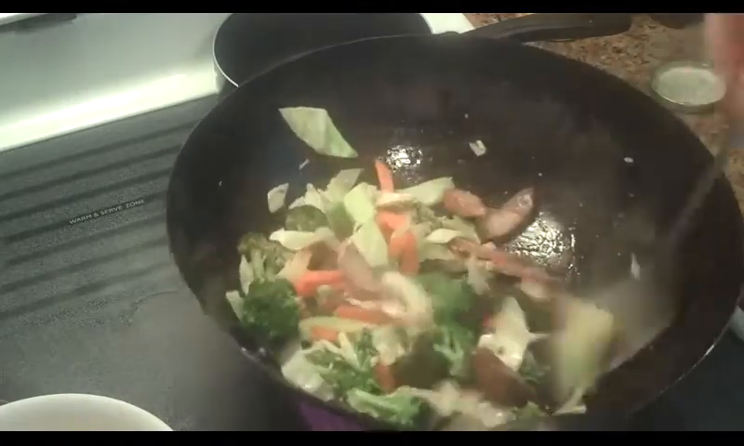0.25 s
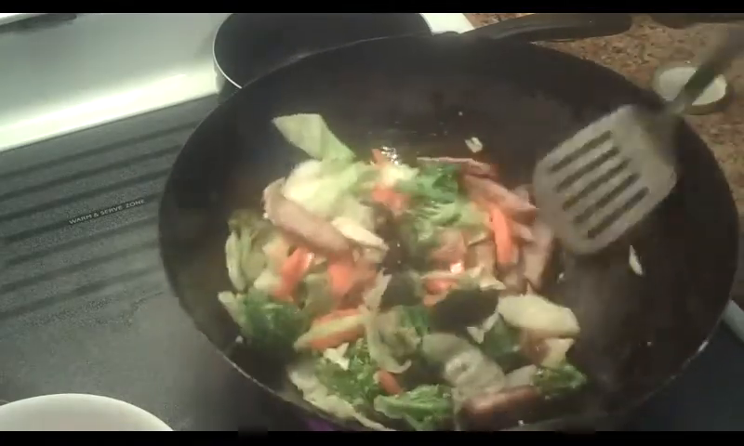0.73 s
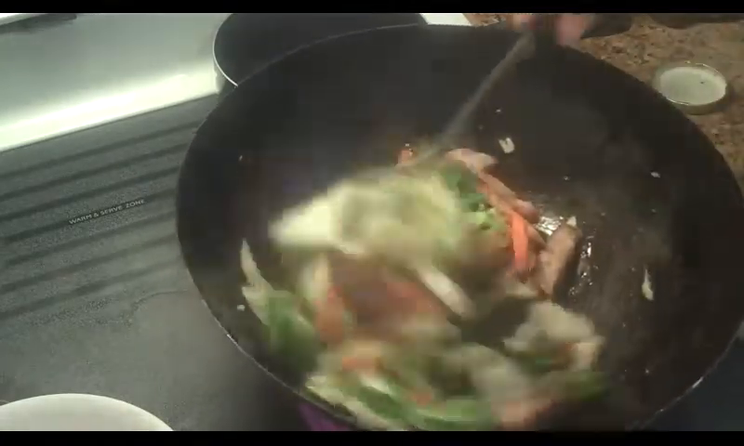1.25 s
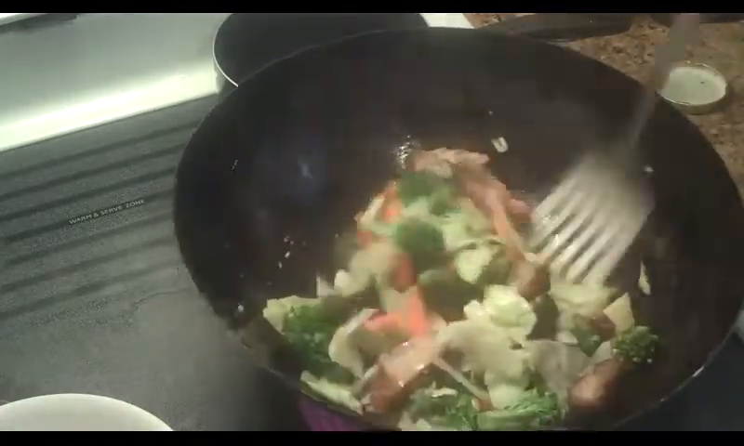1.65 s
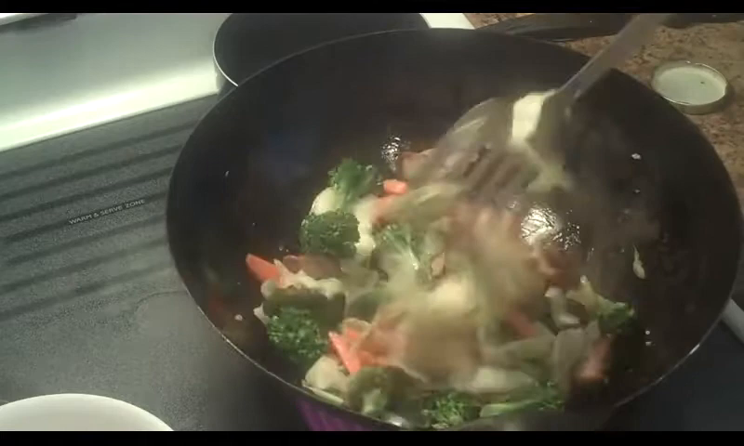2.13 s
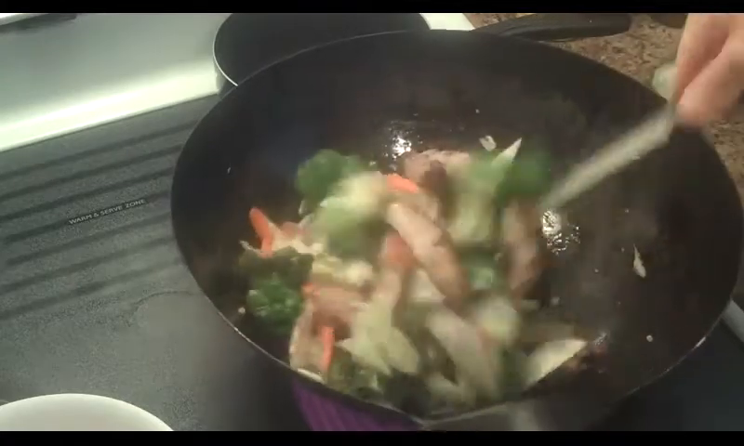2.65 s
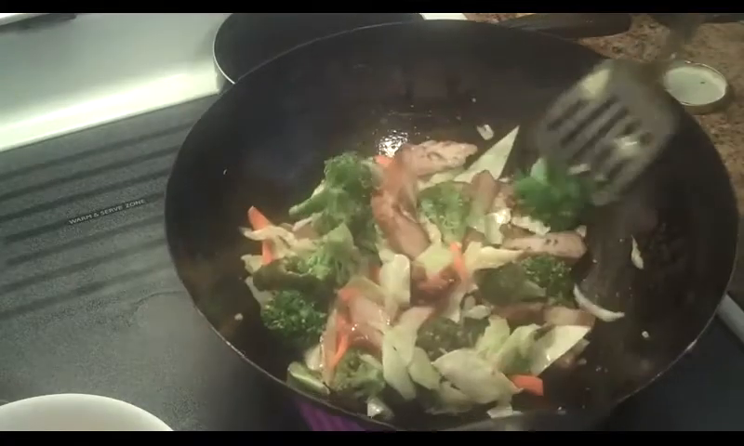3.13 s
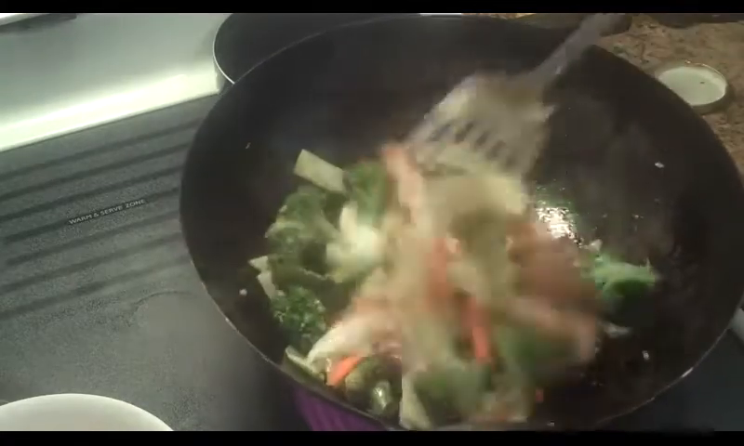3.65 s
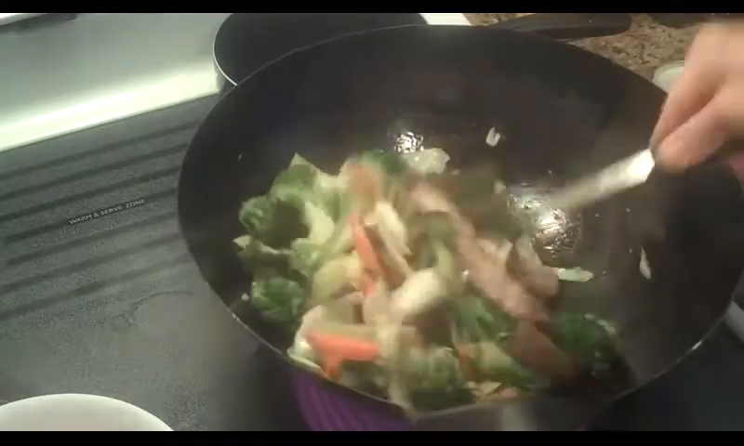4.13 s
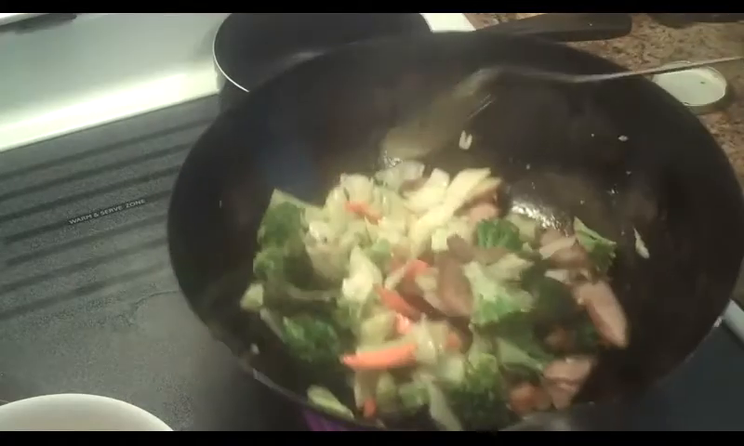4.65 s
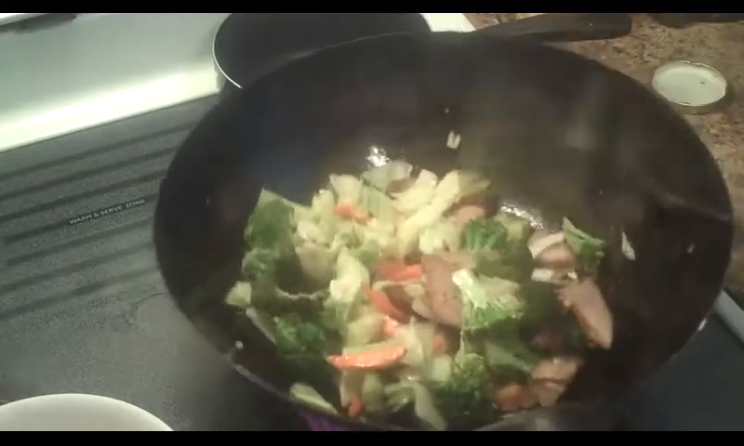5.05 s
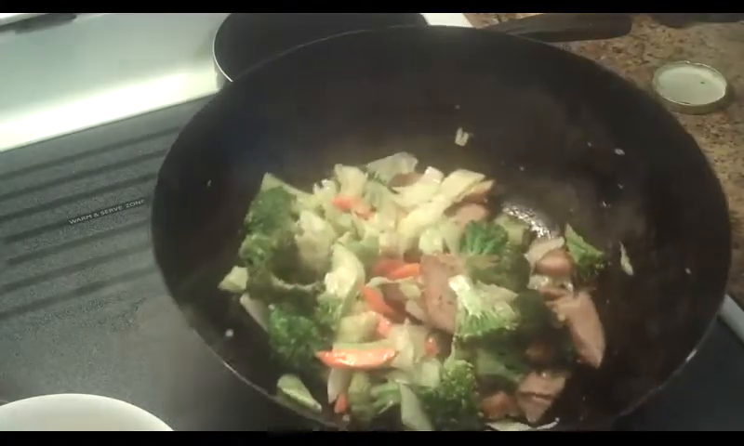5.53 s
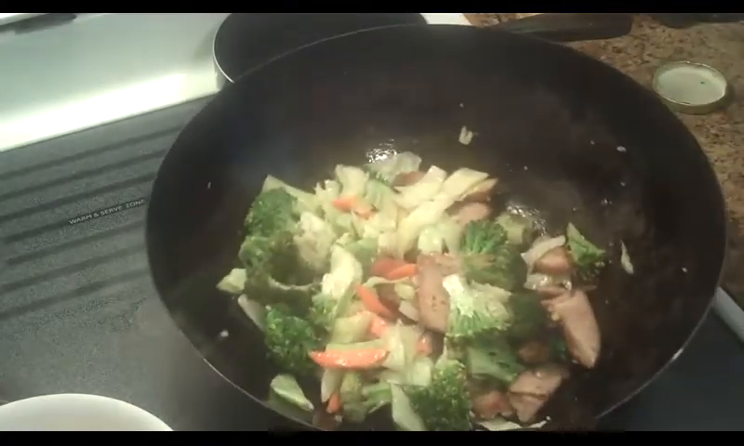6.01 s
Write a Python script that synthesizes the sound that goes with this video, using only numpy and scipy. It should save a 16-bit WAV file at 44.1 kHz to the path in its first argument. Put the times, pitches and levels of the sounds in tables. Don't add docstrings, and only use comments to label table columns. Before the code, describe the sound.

Close to a home stove, oil sizzles and crackles over a low hood hum. A steel spatula hits a food-filled wok five times, with bright damped clanks and raspy scrapes between them. Near the end, two quick louder taps on the rim ring out; the sizzle thins, then the spatula skids jerkily over a glazed dish. One close camera microphone, identical in both channels, slightly dull at the very top.

```python
import sys
import numpy as np
from scipy import signal
from scipy.fft import rfft, irfft
from scipy.io import wavfile
from scipy.ndimage import uniform_filter1d

SR = 44100
rng = np.random.default_rng(int(sys.argv[2]) if len(sys.argv) > 2 else 0)


def generate_wav(sig):
    pcm = np.round(np.clip(np.atleast_2d(sig).T, -1, 1) * 32767).astype(np.int16)
    wavfile.write(sys.argv[1], SR, pcm)


def nominal_scale(level):
    x = np.asarray(level, float) / 20
    return 10 ** x


N = 276948


def unit(x):
    return x / np.sqrt(np.mean(x ** 2) + 1e-30)


def peak_one(x):
    return x / np.abs(x).max()


def band(x, lo_hz, hi_hz):
    return signal.sosfilt(signal.butter(5, [lo_hz, hi_hz], "band", fs=SR, output="sos"), x)


def colour(x, points):
    hz, db = np.transpose(points)
    f = np.maximum(np.fft.rfftfreq(len(x), 1 / SR), 1)
    gain_db = np.interp(np.log(f), np.log(hz), db, left=-60, right=-60)
    return irfft(rfft(x) * nominal_scale(gain_db), len(x))


def ring(force, modes):
    out = 0
    for hz, gain, t60 in modes:
        pole = np.exp(2j * np.pi * hz / SR - np.log(1000) / (t60 * SR))
        out = out + gain * signal.lfilter([1], [1, -pole], force).imag
    return out


def resonances(peaks, narrow):
    modes = []
    for hz, width, db in peaks:
        width = width * narrow
        modes.append((hz, nominal_scale(db) * width, np.log(1000) / (np.pi * width)))
    return modes


def walk(rate):
    k = int(SR / rate)
    return 1.25 * uniform_filter1d(np.repeat(rng.standard_normal(N // k + 1), k), k)[:N]


def grit(rate, spread_db):
    clicks = (rng.random(N) < rate / SR) * rng.choice([-1, 1], N)
    return clicks * nominal_scale(spread_db * np.minimum(rng.exponential(size=N), 4.5))


def patches(x, centres, db_curves):
    f, spec = np.log(np.fft.rfftfreq(len(x), 1 / SR) + 1), rfft(x)
    out = 0
    for row, db in zip(np.eye(len(centres)), db_curves):
        out = out + nominal_scale(db) * irfft(spec * np.interp(f, np.log(centres), row), len(x))
    return out


def course(times, values, off_db=-120):
    return np.interp(np.arange(N) / SR, times, values, left=off_db, right=off_db)


def blow(row, high, low, spot_db, crack_t60, longest_t60):
    # frequency in Hz, level in dB.
    chief_pair = [(3975, 0), (4005, -12)]
    s, high_db, low_db, thump_db, chief_db = row
    t = np.arange(int(.7 * SR)) / SR
    force = np.zeros(len(t))
    force[[0, 330]] = 1, .4

    def struck(modes):
        return ring(force, [(hz, nominal_scale(db + spot_db * rng.standard_normal()), min(t60, longest_t60))
                            for hz, db, t60 in modes])

    high_ring, low_ring = struck(high), struck(low)
    chief_ring = struck([(hz, db, 0.11) for hz, db in chief_pair])
    tail = ring(force, [(hz, nominal_scale(db - 16), 0.31) for hz, db in chief_pair])
    buzz = unit(uniform_filter1d(rng.standard_normal(len(t)), size=150))
    high_ring = high_ring * (1 + .4 * buzz)
    tail = tail * (1 + .8 * buzz)
    fade = nominal_scale(-60 * t / crack_t60)

    def crack(lo_hz, hi_hz, haste):
        return peak_one(band(rng.standard_normal(len(t)), lo_hz, hi_hz) * fade ** haste)

    sound = nominal_scale(high_db) * (0.88 * peak_one(high_ring) + 0.68 * crack(3810, 6340, 1.6))
    sound = sound + nominal_scale(low_db) * (0.78 * peak_one(low_ring) + 0.92 * crack(556, 3280, 2.03))
    sound = sound + nominal_scale(high_db - 14 + 6) * crack(6300, 13000, 2.5)
    sound = sound + nominal_scale(chief_db + 6.0) * peak_one(chief_ring + tail)
    sound = 1.6 * sound * (1 - .6 * np.exp(-t / .013))
    thump = band(rng.standard_normal(700), 21.0, 437)[200:] * np.hanning(500)
    sound[40:540] += nominal_scale(thump_db + 14.5) * peak_one(thump)
    out = np.zeros(N + len(t))
    out[int(s * SR) - 40:][:len(t)] = sound
    return out[:N]


def blows():
    # start in seconds, then peak levels in dB
    strikes = [
        (0.1545, -8.5, -14.5, -39.5, -13),
        (0.9365, -8, -18.5, -56, -24),
        (1.523, -8.5, -20, -37.5, -17),
        (2.24, -5, -20.5, -41, -22),
        (3.7656, -5.5, -16.5, -38, -23.5),
    ]
    taps = [
        (4.9135, -2.5, -3.5, -28.5, -53),
        (5.0683, -5, -9.5, -28.5, -27),
    ]
    # frequency in Hz, level in dB, t60 in seconds.
    blade = [(4581, -4, 0.71), (4899, -12, 3.8), (5491, -2, 0.13), (5599, -9, 0.27), (5809, 0, 0.12),
             (6153, 0, 0.055), (6686, -4, 0.087), (6918, -10, 0.067), (7246, -15, 0.23), (7504, -11, 0.2),
             (7644, -14, 0.37), (7887, -15, 0.24)]
    bowl = [(734, -23, 1.1), (803, -27, 0.28), (1007, -12, 0.17), (1166, -6.5, 2.3), (1307, -4, 0.28),
            (1918, -10, 0.28), (2070, -75, 0.41), (2550, -4, 0.033), (3120, -33, 0.6), (3565, -9, 0.12)]
    rim_near = [(964, -6, 0.12), (1281, -9, 0.26), (1427, -16, 0.16), (1685, -17, 0.56), (1830, -20, 0.39),
                (1949, -17, 0.15), (2083, -13, 0.24), (2229, -13, 0.19), (2509, 0, 0.11), (2708, -14, 0.18),
                (2923, -21, 0.21), (3758, -19, 0.68), (3957, -5, 0.2), (4221, -16, 0.23), (4371, -22, 0.5),
                (5319, -22, 0.45), (5599, -20, 0.27), (5803, -18, 0.31), (6045, -18, 0.23),
                (6105, -20, 0.17), (7558, -22, 0.19), (7634, -22, 0.25), (8010, -30, 0.37),
                (8506, -30, 0.3)]
    rim_far = [(1507, -9, 0.23), (1685, -1, 0.15), (1830, -9, 0.36), (1949, -16, 1.1), (2083, -16, 1.1),
               (2509, 0, 0.17), (3553, -11, 0.22), (3828, -4, 0.16), (4183, -2, 0.17), (4374, -4, 0.25),
               (5303, -12, 0.29), (5502, -8, 0.19), (6207, -8, 0.21), (6422, -7, 0.16), (7079, -6, 0.11),
               (7634, -15, 0.4), (8220, -18, 0.2), (8807, -17, 0.13)]
    long_hz = [657, 759, 845, 964, 1184, 1427, 1685, 1830, 1949, 2083, 4560]
    # t60 in seconds, level in dB after the first strike,
    # after the first tap, after the second tap.
    long_ring = [(5.5, -57, -35.5, -47), (0.89, -43.5, -30, -41), (0.83, -41.5, -27, -48),
                 (1.2, -42, -32, -45), (1.12, -38.5, -33, -46), (1.4, -66, -32, -45),
                 (1.05, -62, -26.5, -31.5), (0.55, -60, -42, -39), (1.18, -48, -42, -39),
                 (0.31, -60, -26, -34), (1.13, -70, -57, -43.5)]
    out = sum(blow(row, blade, bowl, 3, 0.13, 0.079) for row in strikes)
    for row, modes in zip(taps, (rim_near, rim_far)):
        high = [m for m in modes if m[0] > 3000]
        low = [m for m in modes if m[0] < 3000]
        out = out + blow(row, high, low, 0, 0.28, 0.25)
    out[int(strikes[0][0] * SR):][:330] += nominal_scale(-19) * np.hanning(330)
    rebound_s, rebound_db, rebound_hz = 4.926, -24, 303
    knock = np.hanning(800) * np.sin(2 * np.pi * rebound_hz * np.arange(800) / SR)
    out[int(rebound_s * SR):][:800] += nominal_scale(rebound_db) * knock
    quench_s = .012
    starts = [int(row[0] * SR) for row in (strikes[0], *taps)]
    for hz, (t60, *dbs) in zip(long_hz, long_ring):
        for start, stop, db in zip(starts, [starts[1], starts[2], N], dbs):
            n = np.arange(min(N - start, stop - start + 2000))
            stilled = np.exp(-np.maximum(n + start - stop, 0) / (quench_s * SR))
            out[start:][:len(n)] += stilled * ring(nominal_scale(db) * (n == 0), [(hz, 1, t60)])
    return out


def scrapes():
    # frequency in Hz, width in Hz, level in dB.
    edge_peaks = [(4010, 150, -2), (4620, 250, 0), (5450, 220, -3), (5810, 170, -5), (6320, 200, -4)]
    # frequency in Hz, level in dB per Hz.
    rasp_points = [(1940, -37), (3300, -7), (3700, -17), (3980, 0.5), (4730, 3), (5120, -3), (6280, -2),
                   (7030, -10), (12000, -15.5), (13900, -19.5), (14200, -32), (14500, -73)]
    # full contact in seconds, build-up in seconds, drag in seconds,
    # level in dB, sag over the drag in dB.
    strokes = [
        (0.17, .005, 0.13, -29, -8),
        (0.95, .005, 0.2, -27, -12),
        (1.541, .005, 0.19, -25, -19.5),
        (2.26, .005, 0.17, -37.5, -1),
        (2.53, .005, 0.066, -46, -3.5),
        (3.225, 0.13, .09, -29, -3.5),
        (3.78, .005, .17, -31, -6),
    ]
    # time in seconds, rise over the drag in dB.
    snags = [
        (0.252, 5),
        (1.61, 3.5),
        (1.75, 8),
        (2.35, 3),
        (2.425, -1),
        (2.535, 0.5),
        (3.286, 0),
        (3.9, -1),
    ]
    snag_s, build_db, lift_db_s = 0.024, 17, 173
    catch = (unit(grit(4000, 1.8)) + 0.68 * rng.standard_normal(N)) * nominal_scale(0.62 * walk(70))
    centres = 3300 * 1.13 ** np.arange(13)
    rasp = patches(colour(catch, rasp_points), centres, [1.9 * walk(40) for _ in centres])
    edge = unit(ring(catch, resonances(edge_peaks, 1.0)))
    food = unit(band(catch, 1210, 3870))
    snag_db = sum(course([s - snag_s / 4, s, s + snag_s], [0, db, 0], off_db=0) for s, db in snags)
    out = np.zeros(N)
    for s, build, drag, top_db, sag_db in strokes:
        comb = [(hz, 4.1 * rng.standard_normal()) for hz in range(3000, 14600, 45)]
        span = slice(int((s - build - .05) * SR), int((s + drag + .4) * SR))
        fine = unit(colour(rasp[span], comb))
        levels = top_db + np.array([-build_db, 0, sag_db, sag_db - .5 * lift_db_s])
        db = course([s - build, s, s + drag, s + drag + .5], levels)
        t = np.arange(N)[span] / SR
        bright_db = np.interp(t, [s, s + drag], [-5.5, -4])
        food_db = np.interp(t, [s, s + drag], [-20.5, -5])
        sound = unit(band(0.29 * edge[span] + fine, 3560, 7970))
        sound = sound + nominal_scale(bright_db) * unit(band(fine, 7070, 19400)) + nominal_scale(food_db) * food[span]
        out[span] += uniform_filter1d(nominal_scale(db + snag_db)[span], size=400) * sound
    return out


def slide():
    # frequency in Hz, width in Hz, level in dB.
    dish_peaks = [(727, 41, -15), (1370, 51, 0), (1650, 37, -16), (2070, 24, -4), (2350, 44, -2),
                  (2920, 23, -18), (3500, 28, -7), (3710, 22, -13), (3920, 36, -5), (4690, 43, -9),
                  (5000, 68, -20), (5190, 41, -16), (5430, 25, -17), (5660, 49, -18), (6030, 25, -13),
                  (6270, 44, -19), (6630, 28, -14), (7110, 48, -18), (7520, 19, -24), (7760, 42, -21),
                  (8070, 30, -22), (8600, 32, -25), (9630, 37, -24), (10100, 34, -28)]
    # frequency in Hz, level in dB per Hz.
    glaze_points = [(500, -12), (2800, 3), (7000, -3), (10000, -9), (14000, -28)]
    # start in seconds, hold in seconds, then levels in dB
    jerks = [
        (5.932, 0.019, -28, -11.5, -21),
        (5.963, .005, -39, 5.5, -14),
        (5.977, 0.01, -28, -11, -30),
        (6.014, 0.027, -26.5, -4, -33),
        (6.049, .05, -25.5, -4.5, -11),
        (6.113, 0.035, -30, 1.5, -19),
        (6.158, 0.024, -40.5, -1, -18),
        (6.219, 0.046, -47, -4, -22),
    ]
    attack_s, fade_db_s = 0.0041, 650
    slip = (unit(grit(4000, 2.0)) + .8 * rng.standard_normal(N)) * nominal_scale(1.5 * walk(90))
    slip[int(jerks[3][0] * SR)] += 30
    start = int((jerks[0][0] - .05) * SR)
    slip = slip[start:]
    glaze = unit(colour(slip, glaze_points))
    dish = unit(ring(slip, resonances(dish_peaks, 0.63))) + nominal_scale(-44) * glaze
    low = unit(band(dish, 1230, 1700))
    mid = unit(band(dish, 1800, 2900))
    top = unit(band(dish, 3200, 13000))
    body = unit(band(dish, 600, 900))
    higher = mid + nominal_scale(1) * top + nominal_scale(-4) * glaze
    out = 0
    for s, hold, db, high_db, body_db in jerks:
        end = s + attack_s + hold
        levels = db + np.array([-10, 0, 0, -fade_db_s / 10])
        push = nominal_scale(course([s, s + attack_s, end, end + 0.12], levels))[start:]
        out = out + push * (low + nominal_scale(high_db) * higher + nominal_scale(body_db) * body)
    return np.pad(out, (start, 0))


def frying():
    # frequency in Hz, level in dB per Hz.
    sizzle_points = [(530, -37), (900, -15), (1030, -11.5), (1220, -7.5), (1310, -12), (1570, -6.5),
                     (1870, -0.5), (2100, -1), (3470, 0), (7130, -3.5), (13200, -9.5), (14000, -15),
                     (14500, -35)]
    hood_points = [(53, -52), (90, -23), (172, -22.5), (210, -13), (257, -21), (285, -3), (357, -11.5),
                   (446, -8), (532, -8), (565, -1), (749, -6.5), (883, 0), (1030, -4), (1210, -3.5),
                   (1500, -5.5), (1950, -3.5), (3300, -120)]
    # start in seconds, peak level in dB, frequency in Hz.
    pops = [(2.533, -30, 7110), (3.2855, -29, 4130), (3.372, -27, 4730), (3.4174, -26, 5500),
            (3.477, -24, 4740), (1.291, -32, 5000), (1.326, -30, 4400), (3.521, -25, 4530),
            (3.75, -20, 6500), (5.707, -36, 1300), (5.6374, -35, 4390), (6.259, -32, 3920)]
    # time in seconds, level in dB.
    heat = [(0, -43.5), (.19, -35.5), (.35, -45.5), (.58, -44), (.85, -39.5), (1.6, -41), (1.78, -46),
            (2.04, -44.5), (2.3, -39.5), (2.55, -45), (3.29, -35), (3.81, -36.5), (4.05, -43), (4.25, -40),
            (4.91, -30), (5.05, -41), (5.35, -52.5), (6.28, -41)]
    sizzle_db = np.interp(np.arange(N) / SR, *np.transpose(heat))
    swing_db = sizzle_db + 41.5
    top_db = -52 + 1.14 * swing_db
    hood_db = -53 + 0.26 * swing_db
    burst = .5 * unit(grit(3000, 5.7)) + rng.standard_normal(N)
    levels = (sizzle_db, sizzle_db, sizzle_db, sizzle_db, top_db + 7)
    centres = [1200, 2200, 3800, 6500, 11000]
    hiss = patches(unit(colour(burst, sizzle_points)), centres, [db + 1.4 * walk(14) for db in levels])
    hood = unit(colour(rng.standard_normal(N), hood_points)) * nominal_scale(1.0 * walk(10))
    out = nominal_scale(1.0) * hiss + nominal_scale(hood_db + 3.5) * hood
    t = np.arange(400) / SR
    for s, db, hz in pops:
        out[int(s * SR):][:len(t)] += nominal_scale(db) * np.sin(2 * np.pi * hz * t) * np.exp(-t / 0.0016)
    return out


def offset():
    # knock in seconds, drop in thousandths of full scale,
    # crest before it in thousandths of full scale, climb in seconds.
    swings = [
        (.16, 12, 2.4, .5),
        (.935, 2.6, 1.6, .33),
        (1.52, 6.5, 1.8, .17),
        (2.24, 4.2, 2, .25),
        (3.25, 0, 2.8, .65),
        (3.76, 13, 0, .1),
        (4.92, 25, 4.8, .7),
        (5.07, 4, 0, .1),
        (6.11, .5, .8, .5),
    ]
    settle_s, gain_step_hz = .105, 29.5
    t = np.arange(N) / SR
    climbs, drops = 0, 0
    for s, drop, crest, climb in swings:
        angle = course([s - climb, s, s + settle_s / 2], [0, np.pi / 2, 0], off_db=0)
        climbs = climbs + crest * np.sin(angle)
        drops = drops + drop * (t > s) * np.exp(-np.abs(t - s) / settle_s)
    swing = uniform_filter1d(climbs - drops, size=1500, origin=749, mode="nearest") / 1000
    phase = np.arange(N) * gain_step_hz / SR
    size = rng.uniform(0.74, 1.7, int(phase[-1]) + 1)[phase.astype(int)]
    ripple = uniform_filter1d(size * (.5 - phase % 1), size=250)
    return swing + (0.3 * np.maximum(swing, 0) + 0.0004) * ripple


def thin_top(x):
    top_hz = 13900
    hz, _, tiles = signal.stft(x, SR, nperseg=2048)
    chance = rng.random((len(hz) // 4 + 1, tiles.shape[1] // 2 + 1))
    chance = np.repeat(np.repeat(chance, 4, axis=0), 2, axis=1)
    share = np.interp(hz, [7000, 10500, 12500, 13500, top_hz, top_hz + 150], [0, .05, .16, .3, .5, 1])
    keep = chance[:len(hz), :tiles.shape[1]] > share[:, None]
    return signal.istft(tiles * keep, SR, nperseg=2048)[1][:N]


def scene():
    mono = blows() + scrapes() + slide() + frying()
    return np.array([mono, mono])


def low_pass(x):
    return signal.sosfilt(signal.butter(12, 14930, fs=SR, output="sos"), x)


def record(dry):
    x = thin_top(np.tanh(0.78 * dry[0]) / 0.83) + offset()
    return low_pass(np.array([x, x]))


dry = scene()
out = record(dry)
generate_wav(out)
```